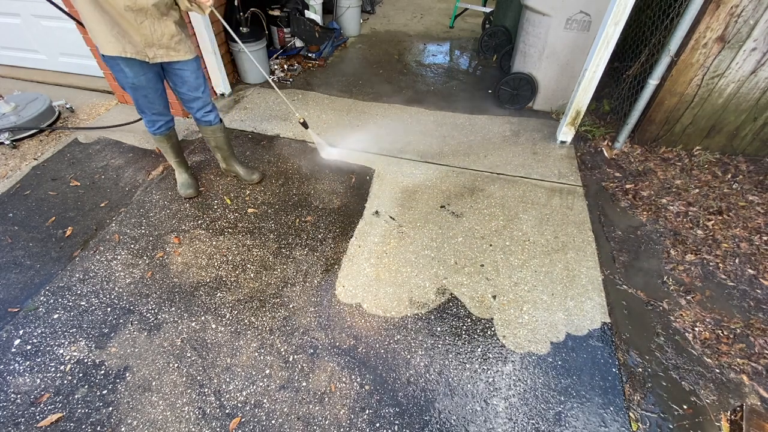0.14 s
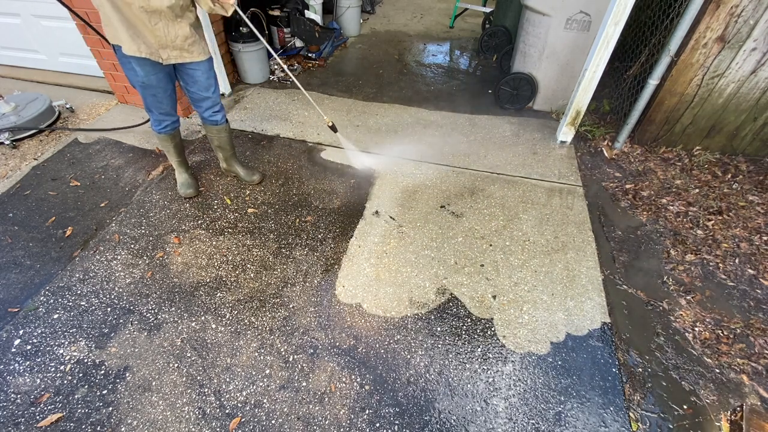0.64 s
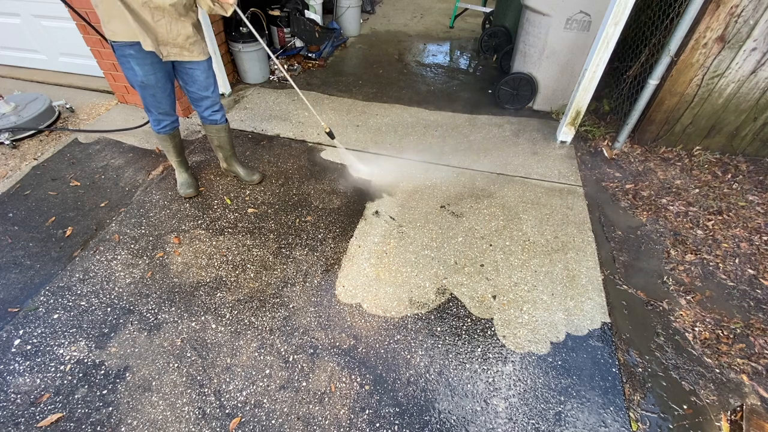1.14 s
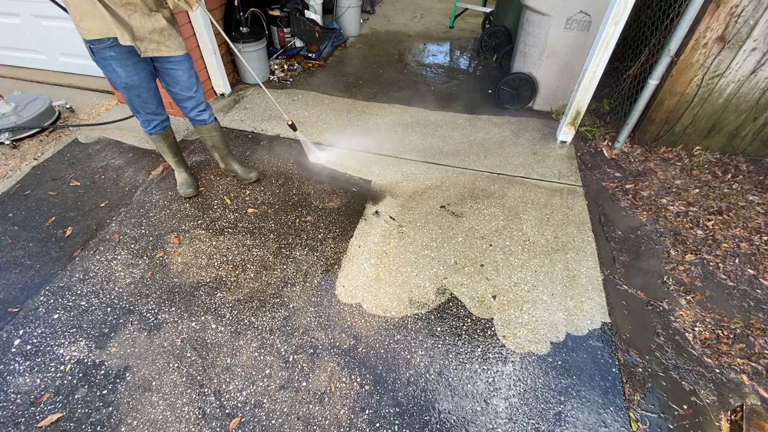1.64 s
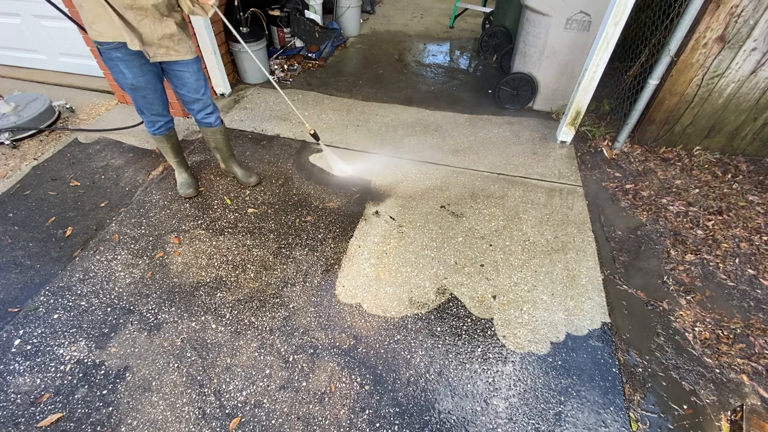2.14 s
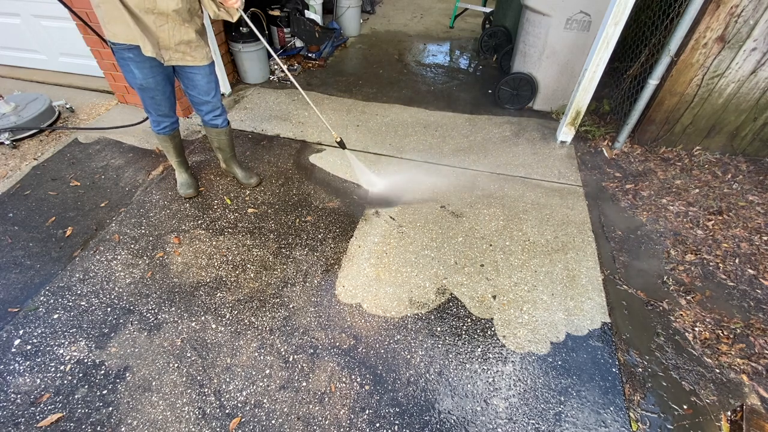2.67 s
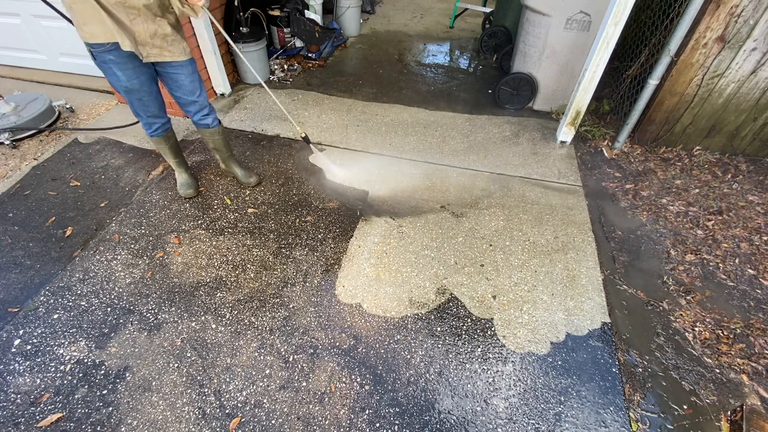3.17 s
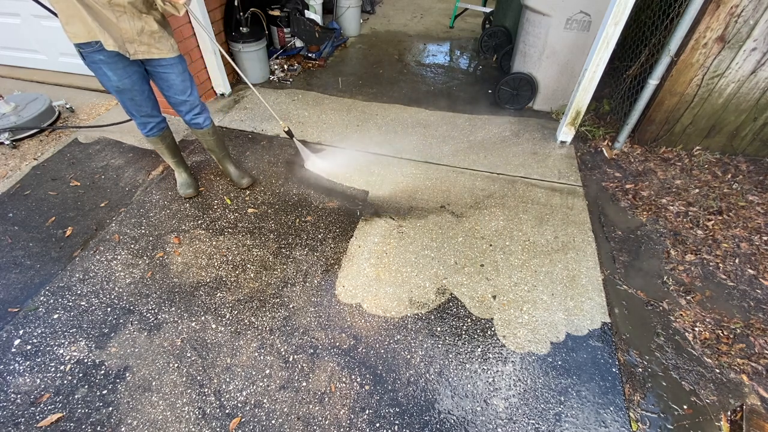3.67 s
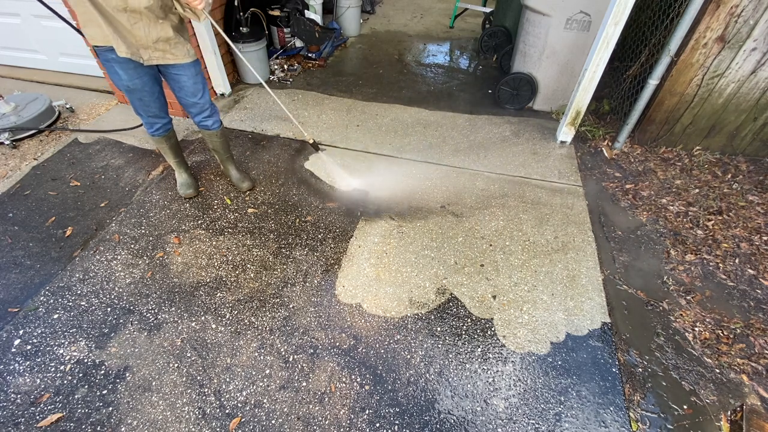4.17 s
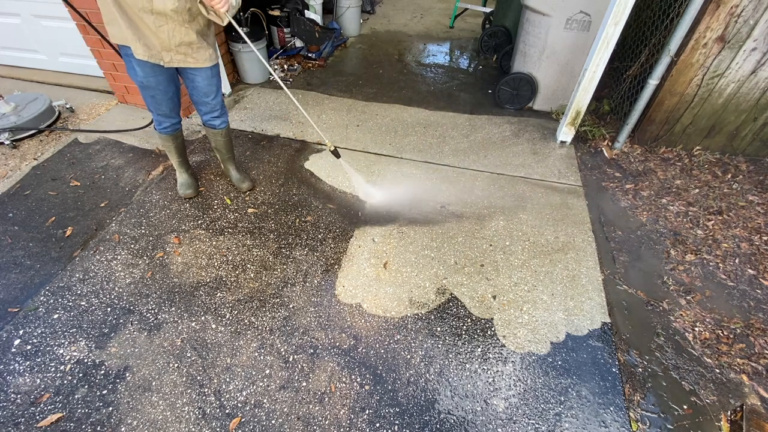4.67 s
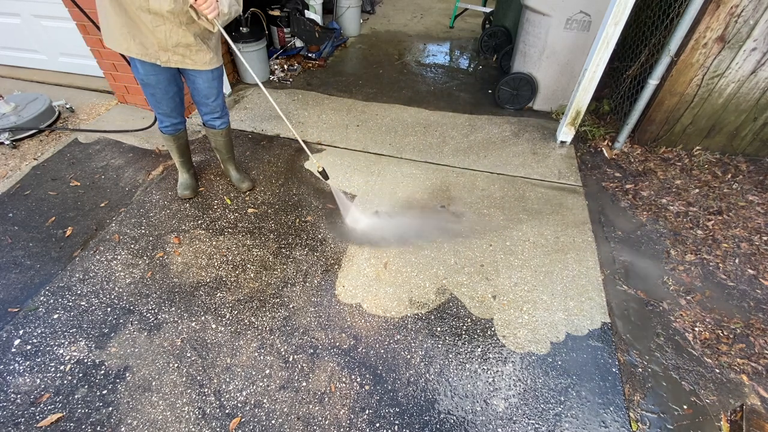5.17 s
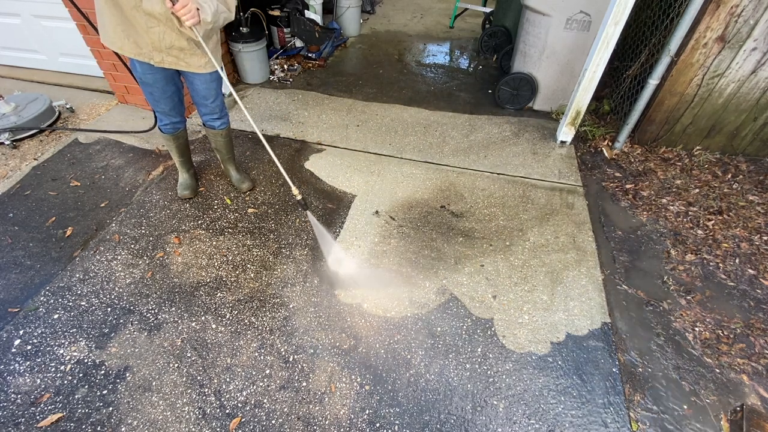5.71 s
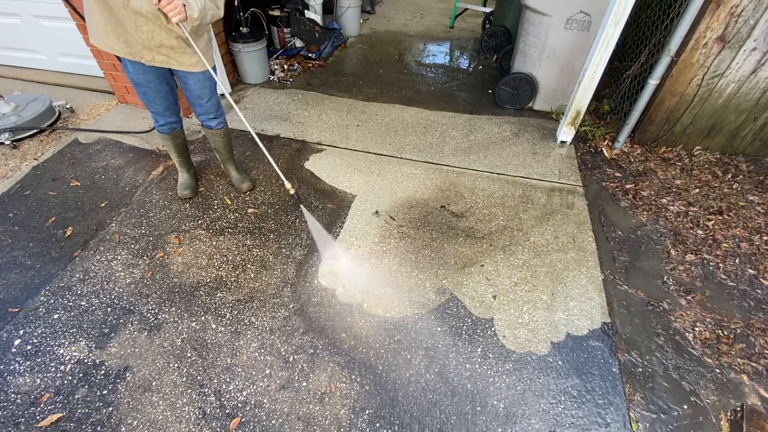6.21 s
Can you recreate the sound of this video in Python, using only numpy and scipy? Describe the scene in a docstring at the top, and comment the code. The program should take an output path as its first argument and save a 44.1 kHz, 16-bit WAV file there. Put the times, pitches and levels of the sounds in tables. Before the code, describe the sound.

Outdoors on a concrete driveway, a pressure washer lance throws a continuous, very bright hiss, with a fine fast throb from its pump. A small petrol engine hums evenly and low underneath. The hiss shifts gently as the lance sweeps from side to side. After about five seconds the spray comes closer: splash and roar swell and low air thumps buffet the close stereo microphone.

```python
"""Outdoors, by a patch of concrete: a pressure washer's jet hisses from the lance and splashes on the ground.
The jet is coloured noise in three layers, puffed by every pump stroke; the lance sweeps slowly from side to side,
and near the end the spray swings close. A single-cylinder petrol engine and its pump hum in sine partials,
valve chatter blurs a few of them, and gusts of low noise push at the two close microphone ports.
Each port hears the jet with a colour, likeness and phase of its own."""
import sys
import numpy as np
from scipy import signal
from scipy.fft import rfft, irfft
from scipy.io import wavfile
from scipy.ndimage import uniform_filter1d

SR = 44100
rng = np.random.default_rng(int(sys.argv[2]) if len(sys.argv) > 2 else 0)


def nominal_scale(level):
    """Amplitude ratio for a level in decibels (scalar or array-like)."""
    x = np.asarray(level, float) / 20
    return 10 ** x


def master(y):
    """Save y as 16-bit WAV."""
    cut = np.clip(np.atleast_2d(y).T, -1, 1)
    pcm = np.round(cut * 32767)  # scale
    wavfile.write(sys.argv[1], SR, pcm.astype(np.int16))


N = 279153  # samples


def rms_one(x):
    """Scale to rms 1."""
    return x / np.sqrt(np.mean(x ** 2) + 1e-20)


def columns(rows, at, log=False):
    """Every column of a table after the first, read at the given times or (log) frequencies."""
    key, *rest = np.transpose(rows)
    warp = np.log if log else np.asarray
    return [np.interp(warp(at), warp(key), column) for column in rest]


def drift(rate_hz):
    """Random wander of rms about 1: noise drawn every 40 samples through a double one-pole low-pass."""
    pole = np.exp(-2 * np.pi * rate_hz * 40 / SR)
    noise = rng.standard_normal(N // 40 + 2002)
    slow = signal.lfilter([1], [1, -2 * pole, pole ** 2], noise)[2000:]  # skip the filter's start
    return np.interp(np.arange(N) / 40, np.arange(len(slow)), rms_one(slow))


def turns(rate_hz):
    """Running angle of a rotation, in radians."""
    return 2 * np.pi * np.cumsum(rate_hz) / SR


# turning points of the lance: time_s, sweep_position (sweep units)
LANCE_SWEEP = [(0.0, 0.68), (0.35, 0.21), (0.82, -1.35), (1.45, 1.2), (1.95, 0.9), (2.45, -0.76),
               (2.85, -0.95), (3.42, 1.35), (4.0, 0.52), (4.58, -1.1), (5.0, -0.5), (5.7, -0.37),
               (6.2, -0.14), (6.33, -0.34)]


def sweep_at(s):
    """Position of the lance: it slows into every turning point."""
    times, places = np.transpose(LANCE_SWEEP)
    index = np.arange(len(times))
    leg = np.interp(s, times, index)
    eased = np.floor(leg) + .5 - .5 * np.cos(np.pi * (leg % 1))
    return np.interp(eased, index, places)


# the spray comes closer: time_s, closing_db (each layer takes its own share)
SPRAY_CLOSING = [(0, 0), (3.6, 0), (4.4, 1.5), (5.0, 2.5), (5.4, 4.5), (5.65, 7.5), (5.74, 7.5), (5.83, 8),
                 (5.88, 10), (5.97, 8), (6.05, 8), (6.2, 9), (6.33, 6.5)]


def closing_at(s):
    """Nearness of the spray, as a gain in dB that the layers share in."""
    return columns(SPRAY_CLOSING, s)[0]


# the two ports: pitch_hz, likeness (0-1), left_minus_right_db,
# likeness_lost (per sweep unit beyond 0.85)
PORT_LIKENESS = [(60, 0, 9, 3), (350, 1, 1, 0.5), (650, 0.7, 2.5, 2.5), (850, 0.7, 3.5, 0.5),
                 (1090, 0.2, 5, 2), (1480, 0.5, 9, -1.5), (2000, 0.37, 6.5, 0), (2620, 0.8, 6, 0),
                 (3270, 0.36, 8, 0.5), (3620, 0.46, 6.5, -2), (3960, 0.4, 9.5, 2), (4300, 0.35, 8.5, -4),
                 (4650, 0.47, 7, -1), (5600, 0.45, 10, -0.5), (6030, 0.47, 4, -2), (6500, 0.45, 3.5, 0.5),
                 (7330, 0.17, 3, -0.5), (7945, 0.75, 2.5, 0), (9960, 0.87, -2, 3), (10600, 1, 6, -1.5),
                 (11400, 0.99, 0, -7), (12700, 0.66, -0.5, 2), (13900, 0.7, 3, 8.5),
                 (14500, 0.96, -6, -2.5)]
# phase between the ports: pitch_hz, left_lead_rad, lead_swing_rad (per sweep unit),
# likeness_gained (per sweep unit)
PORT_LEAD = [(60, 0, 0, 0), (350, .9, 0, 0), (900, 1.2, .2, 0), (1350, 2.3, .3, 0), (1900, 1.6, .5, 0),
             (3300, 2.0, .6, 0), (3620, 2.2, 1, .2), (3960, 2.6, 1.3, .12), (4300, 3.55, .85, 0),
             (4650, 3.3, .6, 0), (5000, 3.0, .5, 0), (5500, 2.8, .7, 0), (6030, 3.55, .75, 0),
             (6370, 4.15, 1, .15), (6720, 4.3, 1.2, .2), (7100, 3.4, 2, 0), (8000, 3.1, .2, 0),
             (8600, .5, .5, 0), (9200, -3, .4, 0), (9700, -3.4, .2, 0), (10300, -6.0, 0, 0),
             (11700, -6.7, .1, 0), (13000, -9.0, .2, 0), (13800, -9.7, 0, 0), (14600, -11.6, 0, 0),
             (15300, -12.6, 0, 0)]
# colour that shifts with the sweep, as echoes off the ground move:
# pitch_hz, left_db (per sweep unit), right_db (per sweep unit)
GROUND_COLOUR = [(600, 1.1, 1), (2000, 1.1, 1.4), (2970, 0.5, 1), (4300, 1, 0.5), (5000, 0.5, 3),
                 (5570, 1.4, -1.5), (6870, 3, 1.5), (7790, -3, 2), (8860, 5, 2.5), (9230, 2.5, -3),
                 (10100, 0, 2), (11500, 2, 1.5), (11560, 2, 2.5), (13000, 0, -1), (14750, 1.5, 3.5),
                 (16200, 0, -7)]
# hollows at the left port that slide as the jet moves: centre_hz, slide_hz (per sweep unit),
# rise_hz (per dB of closing), width_hz, depth_db, likeness_lost (share)
LEFT_HOLLOWS = [(3925, -110, 47, 280, 6, 0.23), (6970, 395, 0, 195, 1.5, .3)]


def at_ports(spectrum, patchy_db):
    """Coloured, patchy noise, partly shared by the two ports, that changes colour with the sweep; rms 1."""
    frame = 512  # samples
    near_likeness, near_under_hz = 0.069, 4000  # share of unlikeness lost per dB of closing; soft upper limit
    hz, s, (shared, own) = signal.stft(rng.standard_normal((2, N)), SR, nperseg=frame)
    hz = np.maximum(hz, 10)[:, None]
    sweep, closing_db = sweep_at(s), closing_at(s)

    alike, lean_db, lost_at_end = columns(PORT_LIKENESS, hz, log=True)
    lead, swing, gained = columns(PORT_LEAD, hz, log=True)
    alike = np.clip(alike + gained * sweep - lost_at_end * np.maximum(sweep - .85, 0), -1, 1)
    nearness = np.clip(near_likeness * closing_db, 0, 1) / (1 + (hz / near_under_hz) ** 4)
    alike = alike + (1 - alike) * nearness

    hollow_db = 0
    for centre_hz, slide_hz, rise_hz, width_hz, depth_db, lost in LEFT_HOLLOWS:
        middle_hz = centre_hz + slide_hz * sweep + rise_hz * closing_db
        dip = np.exp(-.5 * ((hz - middle_hz) / width_hz) ** 2)
        hollow_db = hollow_db + depth_db * dip
        alike = alike * (1 - np.clip(lost, 0, 1) * dip)

    left_db, right_db = columns(GROUND_COLOUR, hz, log=True)
    patches = uniform_filter1d(rng.standard_normal(shared.shape), size=5, axis=0)
    patches = rms_one(uniform_filter1d(patches, size=9, axis=1))
    colour_db = columns(spectrum, hz, log=True)[0] + patchy_db * patches
    left = shared * nominal_scale(colour_db + lean_db / 2 + left_db * sweep - hollow_db)
    delayed = shared * np.exp(-1j * (lead + swing * sweep + 0.18 * patches))
    right = alike * delayed + np.sqrt(1 - alike ** 2) * own
    right = right * nominal_scale(colour_db - lean_db / 2 + right_db * sweep)
    return rms_one(signal.istft(np.stack([left, right]), SR, nperseg=frame)[1][:, :N])


def throb(angle, depth_db, sharp, uneven):
    """Each pump stroke lifts the jet in a short puff of uneven strength; rms 1."""
    puff = np.cos(angle) + sharp * np.cos(2 * angle - .6) + sharp ** 2 * np.cos(3 * angle)
    strength = 0.5 + uneven * drift(35.0)  # the half makes depth_db a peak-to-trough swing
    return rms_one(nominal_scale(depth_db * puff * strength))


# colour of the nozzle hiss: pitch_hz, relative_db (density)
HISS_COLOUR = [(3500, -28), (4600, -13), (5300, -9), (6200, -8), (7300, -6.5), (8300, -5.5), (9300, -1),
               (10000, -2), (10700, -0.5), (11700, 3), (12500, 1.5), (13500, -5), (14800, -0.5),
               (16000, -8.5)]


def hiss(stroke, sweep, closing_db):
    """Bright noise at the nozzle, sputtering slowly and quickly, throbbing with the pump."""
    level_db = -23.5 - 1.4 * sweep + 0.12 * closing_db
    sputter_db = .5 * drift(7.3) + 0.42 * drift(230.0)
    nozzle = throb(stroke - .3, depth_db=3.0, sharp=.42, uneven=.15)
    return nominal_scale(level_db + sputter_db) * nozzle * at_ports(HISS_COLOUR, patchy_db=1.02)


# colour of the splash: pitch_hz, relative_db (density)
SPLASH_COLOUR = [(900, -15), (1300, -4), (2000, -4), (2800, -1), (3400, -2), (4000, -2), (5000, -6),
                 (7000, -27.5)]


def splash(stroke, sweep, closing_db):
    """Midrange noise where the water meets the concrete, rougher as the spray comes closer."""
    level_db = -38 - 1.5 * sweep + 0.74 * closing_db
    splatter_db = 0.1322 * closing_db * drift(60.0)
    impact = throb(stroke + .8, depth_db=1.5, sharp=.3, uneven=.5)
    return nominal_scale(level_db + splatter_db) * impact * at_ports(SPLASH_COLOUR, patchy_db=1.5)


# colour of the roar: pitch_hz, relative_db (density)
ROAR_COLOUR = [(60, -10), (120, -14), (250, -8), (350, -1), (480, -2), (600, 1), (850, 0.5), (1200, -4.5),
               (2000, -17)]


def roar(stroke, sweep, closing_db):
    """Lower noise from the water on the concrete, heaving more as the spray comes closer."""
    level_db = -42.5 - 1.5 * sweep + 0.91 * closing_db
    heave_db = (0.5 + 0.05 * closing_db) * drift(9.4)
    sheet = throb(stroke - 2.2, depth_db=2.0, sharp=.2, uneven=.4)
    return nominal_scale(level_db + heave_db) * sheet * at_ports(ROAR_COLOUR, patchy_db=0.8)


def jet(stroke, closing_db):
    """Hiss at the nozzle, splash and roar at the concrete, all following the sweep and the pump."""
    sweep = sweep_at(np.arange(N) / SR)
    layers = [layer(stroke, sweep, closing_db) for layer in (hiss, splash, roar)]
    return sum(layers)


# where the machine stands: pitch_hz, left_minus_right_db, left_lead_rad
MACHINE_PLACE = [(56, -3, 0), (85, -3, .2), (113, -7, .8), (118, -4, .3), (141, -4, .6), (169, -1, .9),
                 (198, -3, 1.4), (230, 0, 1.2), (282, 2, 1.4), (340, 5, 1.5), (400, 4, 1.7),
                 (600, 5.5, 2.0), (800, 5, 2.0)]


def hum(angle, rate_hz, partials, waver_db, shape_rad):
    """Sine partials locked to one rotation, leaning to one port in level and phase."""
    out = np.zeros((2, N))
    for multiple, level_db in partials:
        lean_db, lead = columns(MACHINE_PLACE, multiple * np.mean(rate_hz), log=True)
        waver = waver_db * np.sqrt(multiple) * drift(4.8)  # upper partials waver more
        size = np.sqrt(2) * nominal_scale(level_db + waver)
        # upper partials sit off the pulse by a fixed phase step of random sign
        offset = .15 * max(multiple - 5, 0) * rng.choice([-1, 1])
        for port, side in enumerate((.5, -.5)):
            phase = multiple * angle + offset + shape_rad + side * lead
            out[port] += nominal_scale(side * lean_db) * size * np.cos(phase)
    return out


# exhaust note: multiple (of the firing rate), level_db (rms, before the lean between ports)
EXHAUST_NOTE = [(1, -72), (2, -41.5), (3, -48.5), (4, -55.5), (5, -46), (6, -48.5), (7, -55.5), (8, -58),
                (9, -59), (10, -59), (11, -61.5), (12, -61), (13, -62), (14, -63), (15, -66), (17, -70),
                (18, -72), (19, -71), (20, -65), (21, -65.5), (23, -69), (24, -67), (26, -67.5),
                (28, -63.5)]
# engine speed: time_s, firing_hz
FIRING_RATE = [(0, 28.25), (1.05, 28.235), (3.05, 28.226), (3.55, 28.2), (4.05, 28.225), (4.55, 28.155),
               (5.05, 28.17), (6.33, 28.19)]


def engine(s):
    """Exhaust note: partials of the firing rate, with a slight wander in timing."""
    firing_hz, = columns(FIRING_RATE, s)
    firing_angle = turns(firing_hz) + 2.1 + .015 * drift(4.0)
    return hum(firing_angle, firing_hz, EXHAUST_NOTE, waver_db=0.39, shape_rad=1.7)


# pump speed: time_s, stroke_hz
STROKE_RATE = [(0, 118.5), (.55, 118.54), (1.05, 118.21), (1.8, 118.29), (2.55, 118.44), (3.05, 118.26),
               (3.55, 118.3), (4.05, 118.54), (4.55, 118.24), (5.05, 118.21), (6.33, 118.0)]


def pump_strokes(s):
    """Stroke rate in Hz and running stroke angle, with a slight wander in timing."""
    stroke_hz, = columns(STROKE_RATE, s)
    return stroke_hz, turns(stroke_hz) + 4.2 + .08 * drift(3.0)


# pump hum: multiple (of the stroke rate), level_db (rms, before closing and the lean between ports)
PUMP_NOTE = [(1, -44), (2, -54), (3, -63), (4, -65)]


def pump(stroke, stroke_hz, closing_db):
    """Partials of the stroke rate, losing 0.61 dB for each dB that the spray closes."""
    tone = hum(stroke - .9, stroke_hz, PUMP_NOTE, waver_db=.4, shape_rad=-1.2)
    return nominal_scale(-0.61 * closing_db) * tone


# valve chatter: multiple (of the stroke rate), level_db (rms, before the lean between ports)
VALVE_CHATTER = [(2, -63.5), (3, -61), (5, -57), (6, -60)]


def chatter(stroke, stroke_hz):
    """Valve chatter blurs some pump partials into narrow noise: their size and phase wander quickly."""
    waver_hz = 7.0
    out = np.zeros((2, N))
    for multiple, level_db in VALVE_CHATTER:
        lean_db, lead = columns(MACHINE_PLACE, multiple * stroke_hz[0], log=True)
        wander = drift(waver_hz) + 1j * drift(waver_hz)
        for port, side in enumerate((.5, -.5)):
            carrier = np.exp(1j * (multiple * stroke + side * lead))
            out[port] += nominal_scale(level_db + side * lean_db) * np.real(wander * carrier)
    return out


# colour of the moving air: pitch_hz, relative_db (density)
AIR_COLOUR = [(20, -17), (40, -9), (80, 3), (170, -1), (260, -4), (350, -15), (600, -27)]
# gusts of air that the spray pushes at the ports: time_s, peak_db (before the lumpiness and lean),
# width_s (standard deviation), left_minus_right_db
AIR_GUSTS = [(1.62, -50, 0.11, -4), (1.85, -52, .012, 6), (2.61, -48, 0.016, -5), (2.92, -54, .05, -6),
             (3.33, -48, .015, 8), (4.42, -53, .05, 2), (4.95, -46, 0.041, -4), (5.1, -47, 0.022, 1),
             (5.33, -44, .02, 1), (5.42, -47, .04, -2), (5.52, -35, 0.021, -1), (5.56, -41, .01, 5),
             (5.588, -36, 0.011, -2), (5.615, -32, .01, 13), (5.665, -38, 0.013, -5), (5.73, -36, .008, -2),
             (5.83, -46, 0.073, -2), (5.95, -49, 0.025, -3), (6.11, -44, 0.017, -4), (6.29, -45, 0.036, 3)]


def draught(closing_db):
    """Lumpy low rumble with short gusts, partly each port's own, partly pushing one while pulling the other."""
    hz = np.maximum(np.arange(N // 2 + 1) * SR / N, 10)
    colour = nominal_scale(columns(AIR_COLOUR, hz, log=True)[0])
    shared, left, right = irfft(rfft(rng.standard_normal((3, N))) * colour, N)
    air = rms_one(np.array([left, right]) + 0.9 * shared * [[1], [-1]])

    s = np.arange(N) / SR
    side = np.array([[.5], [-.5]])
    level = nominal_scale(-56.5 + 0.49 * closing_db - 4 * side)  # between gusts, leaning right
    for at, peak_db, width, lean_db in AIR_GUSTS:
        level = level + nominal_scale(peak_db + lean_db * side) * np.exp(-.5 * ((s - at) / width) ** 2)
    lumps = nominal_scale(3.1 * drift(29.0))
    return level * lumps * air


def scene():
    """Jet, pump, engine and the air that the spray moves, summed."""
    s = np.arange(N) / SR
    closing_db = closing_at(s)
    stroke_hz, stroke = pump_strokes(s)
    machine = engine(s) + pump(stroke, stroke_hz, closing_db) + chatter(stroke, stroke_hz)
    return jet(stroke, closing_db) + machine + draught(closing_db)


# sum or difference is dropped where it lies this far under the other: pitch_hz, under_db
# (negative: it must be stronger than the other by that much to stay)
STEREO_DROP = [(2500, 14), (3600, 9), (4400, 8), (5300, 11), (6200, 8), (7000, 7.5), (8000, 4), (10000, 11),
               (11500, 1.5), (13500, 5), (15500, -1.5)]


def joint_stereo(x):
    """Band by band and frame by frame, drop the sum or the difference where it is weak beside the other."""
    hz, _, pair = signal.stft([x[0] + x[1], x[0] - x[1]], SR, nperseg=2048)
    edges = np.r_[0:320:16, 320:len(hz):32]  # in bins
    bands = np.searchsorted(edges, np.arange(len(hz)), side="right") - 1
    power = np.add.reduceat(abs(pair) ** 2, edges, axis=1)
    power = uniform_filter1d(power, size=3, axis=2)[:, bands]
    under_db, = columns(STEREO_DROP, np.maximum(hz, 10), log=True)
    limit = nominal_scale(-2 * under_db)[:, None]  # power ratio
    kept = pair * (power > limit * power[::-1])
    total, difference = signal.istft(kept, SR, nperseg=2048)[1][:, :N]
    return np.array([total + difference, total - difference]) / 2


def roll_off(x):
    """The treble ends steeply here."""
    return signal.sosfilt(signal.butter(12, 17080, fs=SR, output="sos"), x)


def record(dry):
    """A steep low-pass at 15.72 kHz, then weak sum or difference bands are dropped."""
    low_pass = signal.ellip(12, .3, 70, 15720, fs=SR, output="sos")  # .3 dB ripple, 70 dB stop band
    mix = joint_stereo(signal.sosfilt(low_pass, dry))
    return roll_off(mix)


dry = scene()
out = record(dry)
master(out)
```